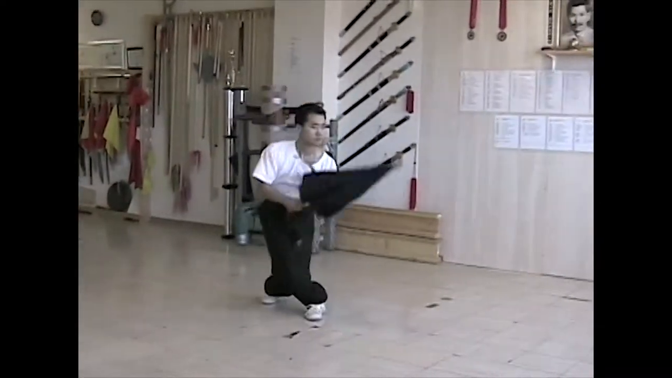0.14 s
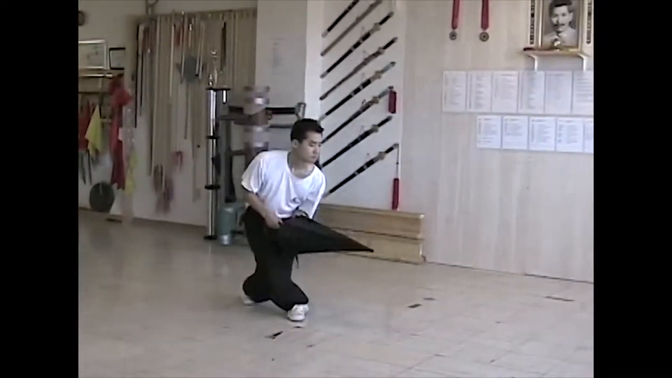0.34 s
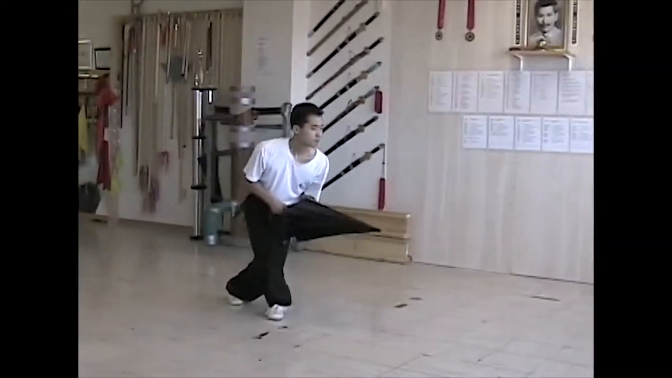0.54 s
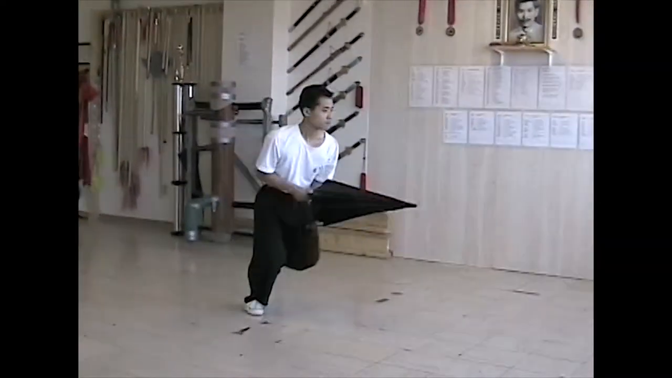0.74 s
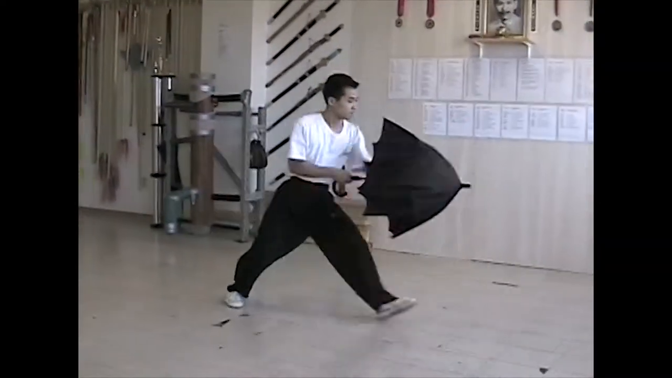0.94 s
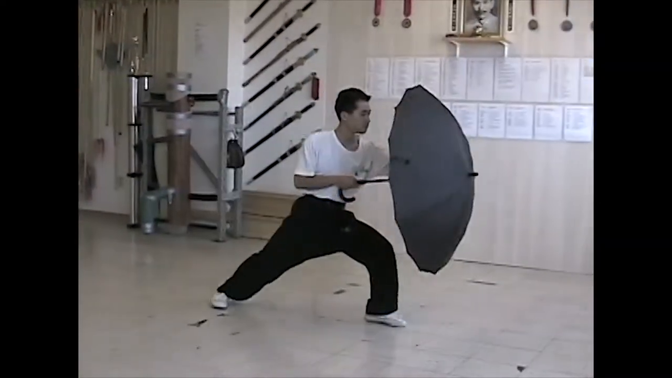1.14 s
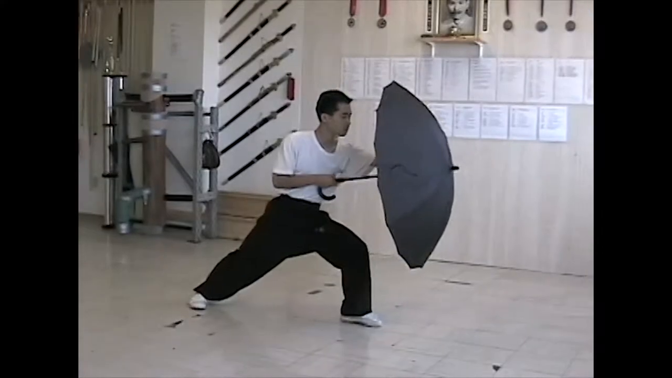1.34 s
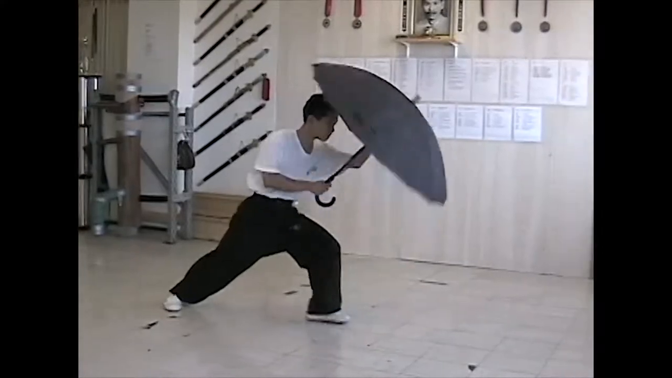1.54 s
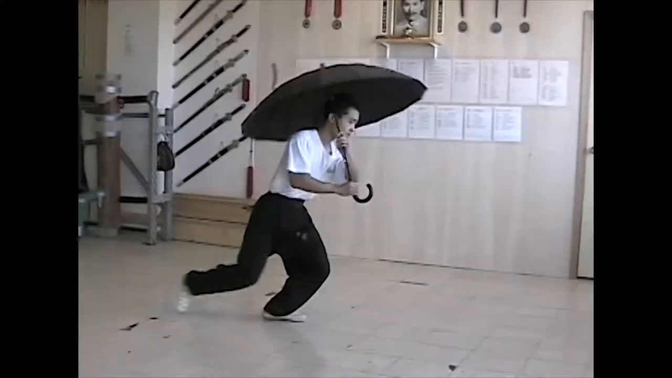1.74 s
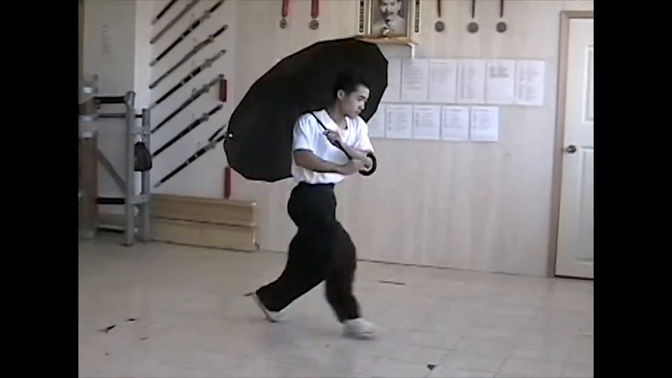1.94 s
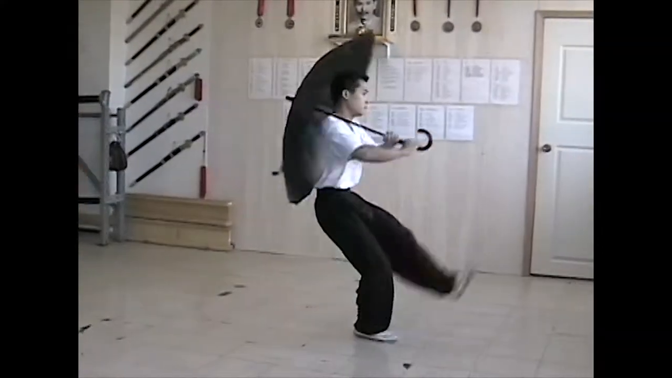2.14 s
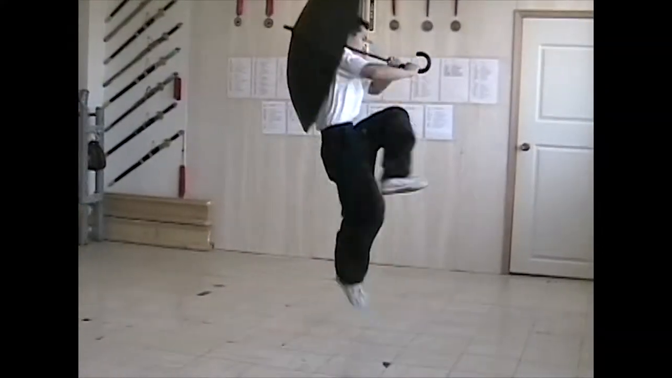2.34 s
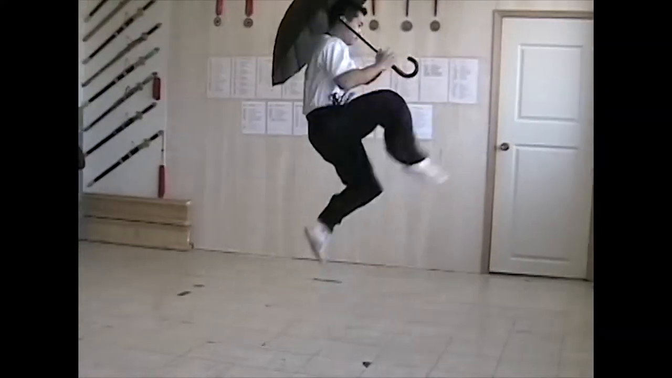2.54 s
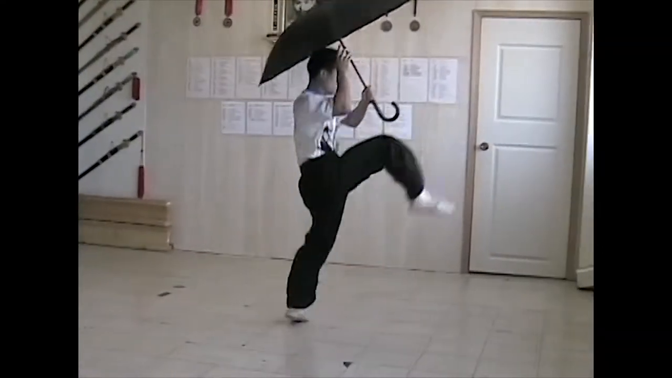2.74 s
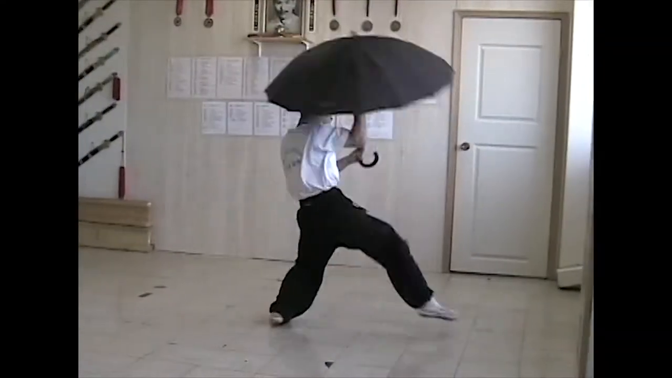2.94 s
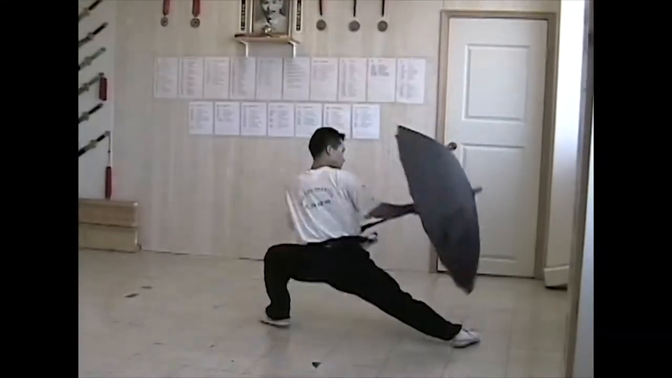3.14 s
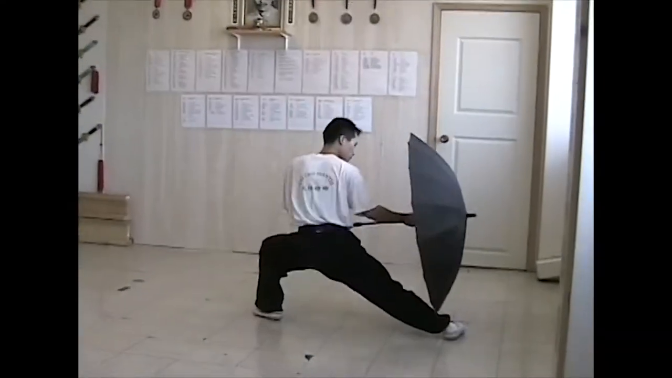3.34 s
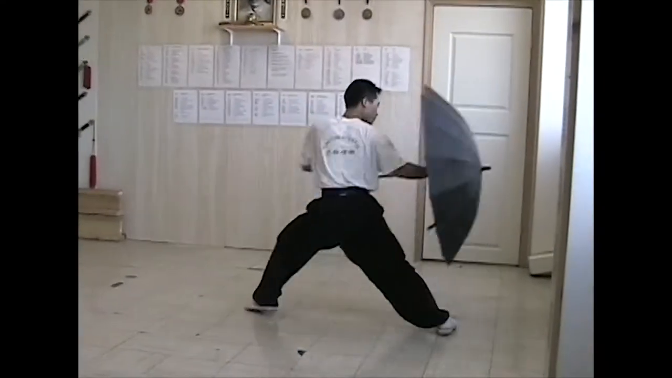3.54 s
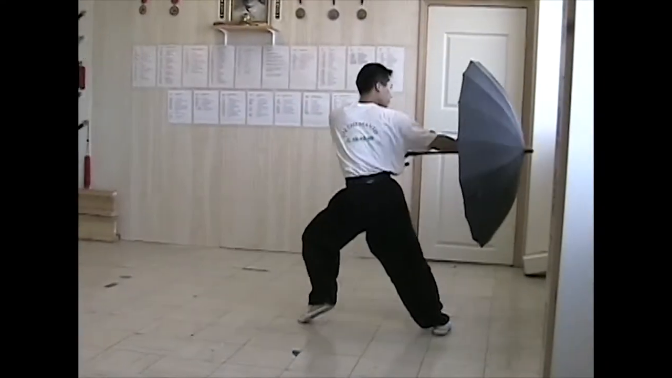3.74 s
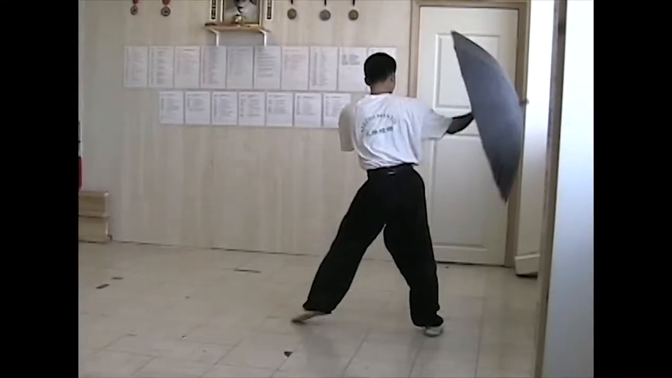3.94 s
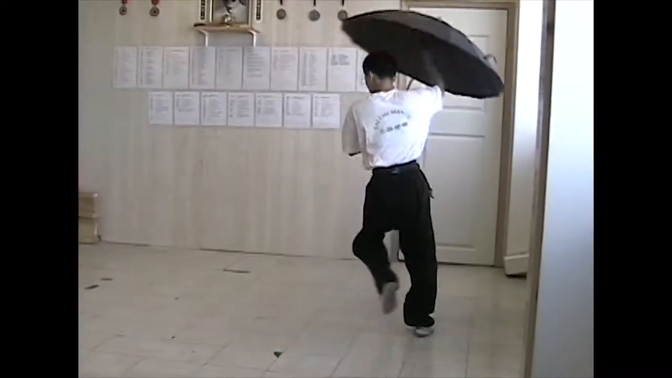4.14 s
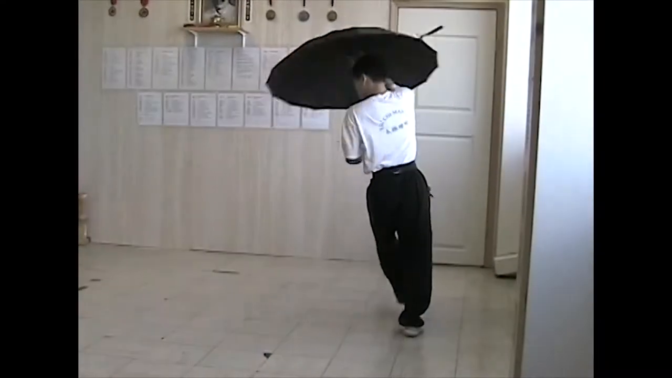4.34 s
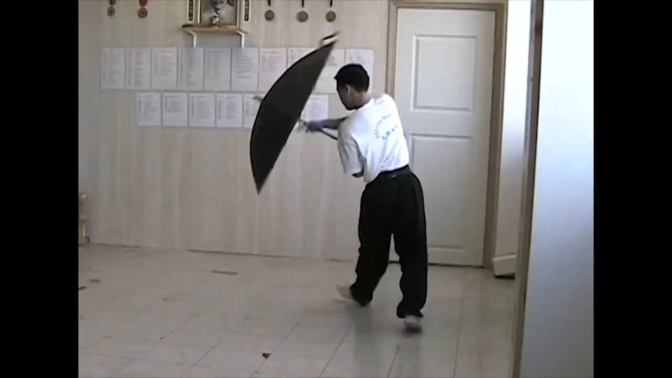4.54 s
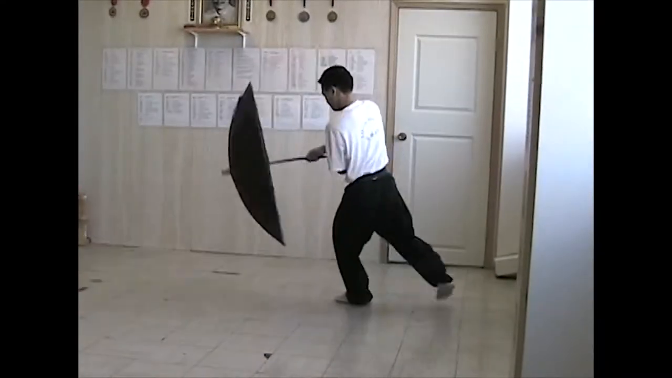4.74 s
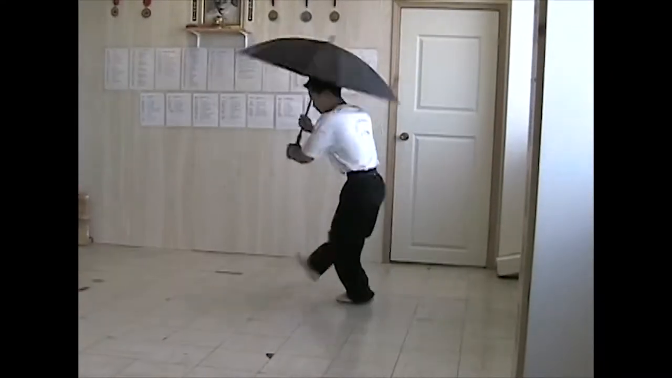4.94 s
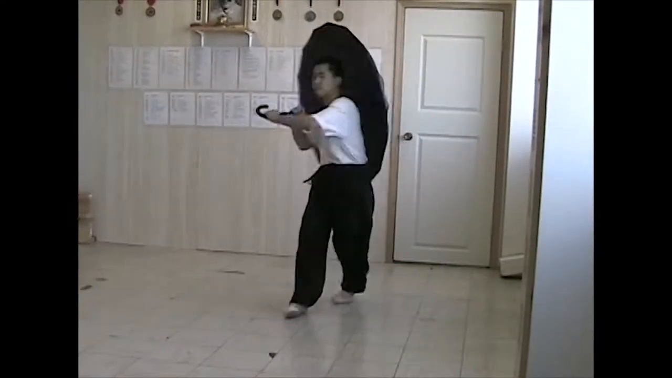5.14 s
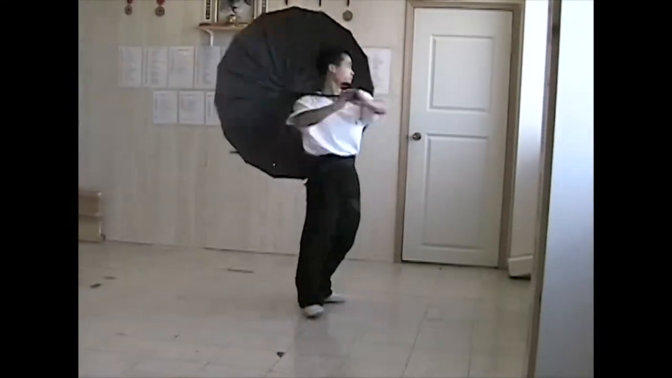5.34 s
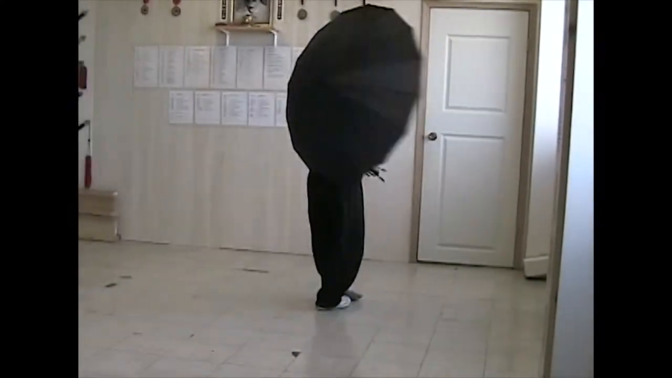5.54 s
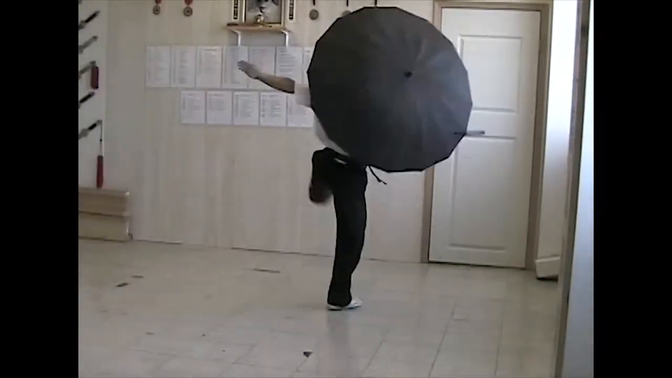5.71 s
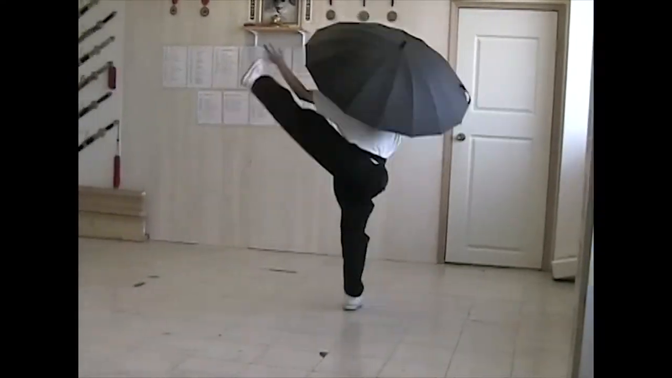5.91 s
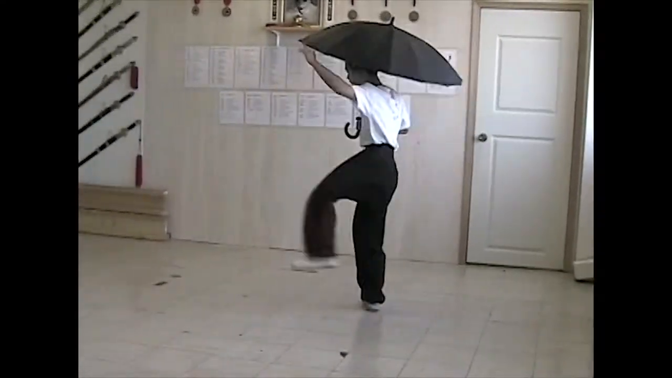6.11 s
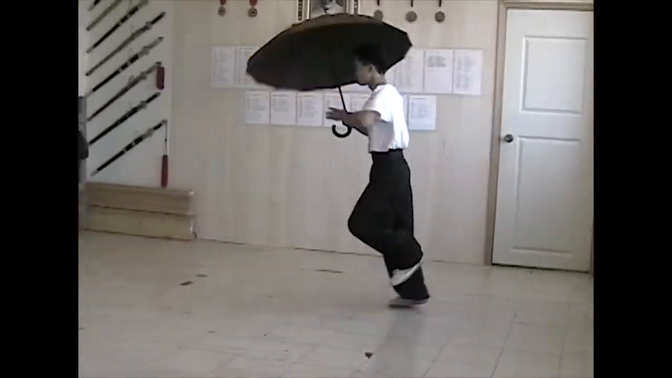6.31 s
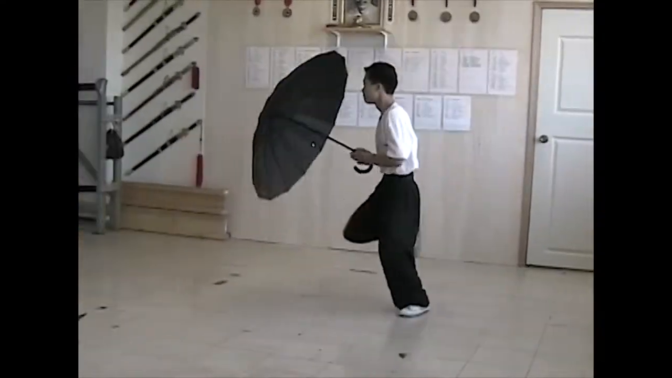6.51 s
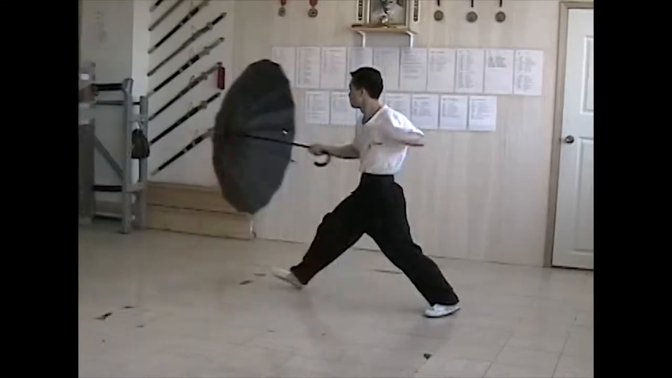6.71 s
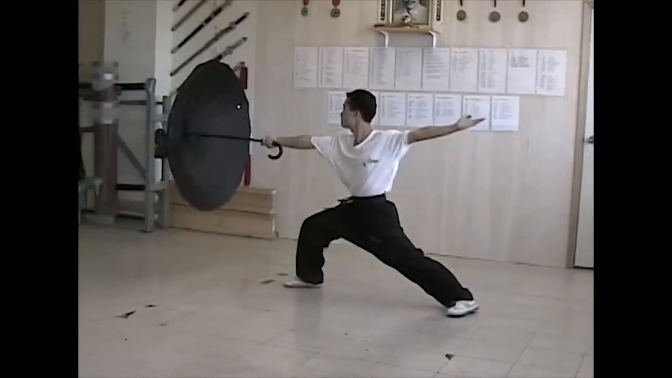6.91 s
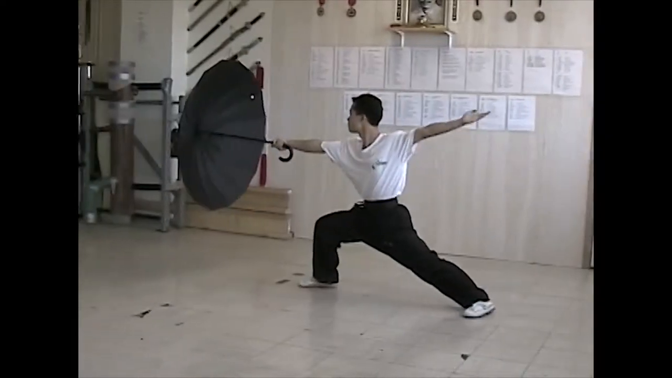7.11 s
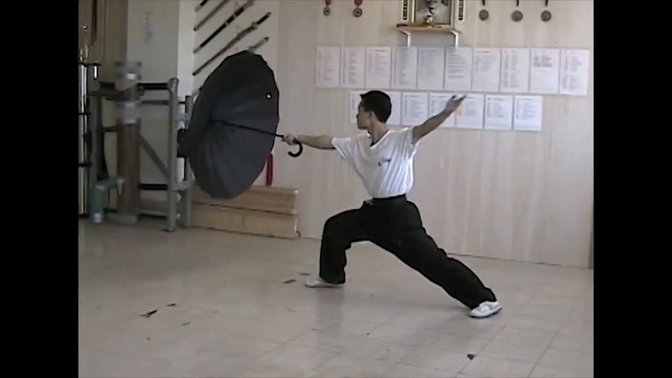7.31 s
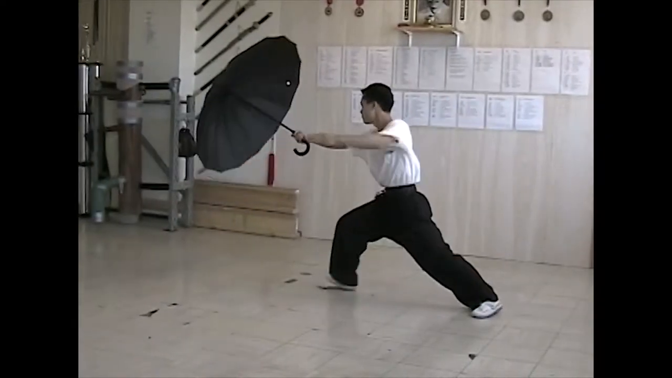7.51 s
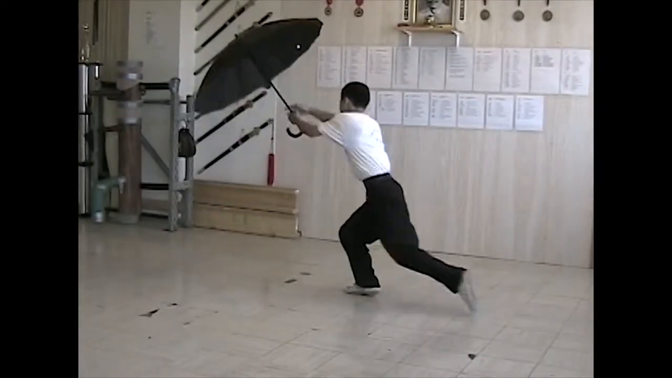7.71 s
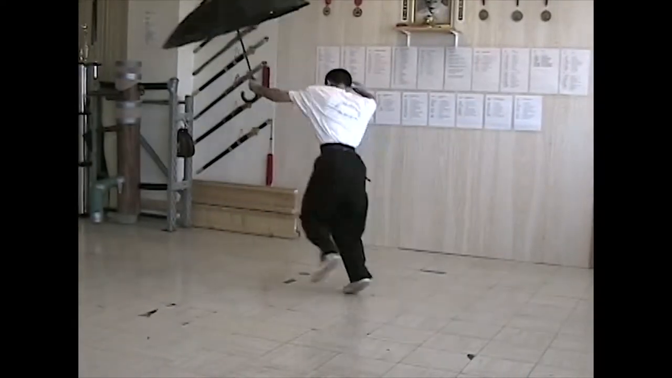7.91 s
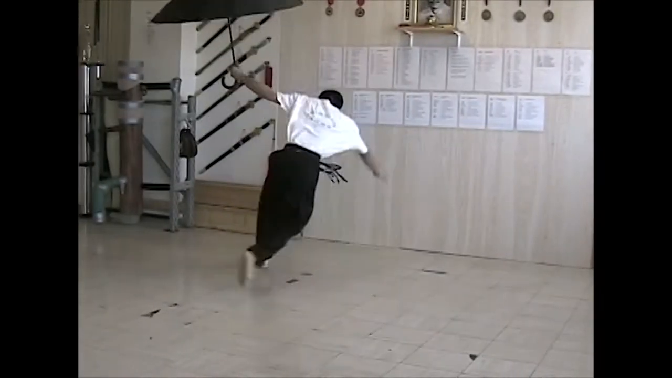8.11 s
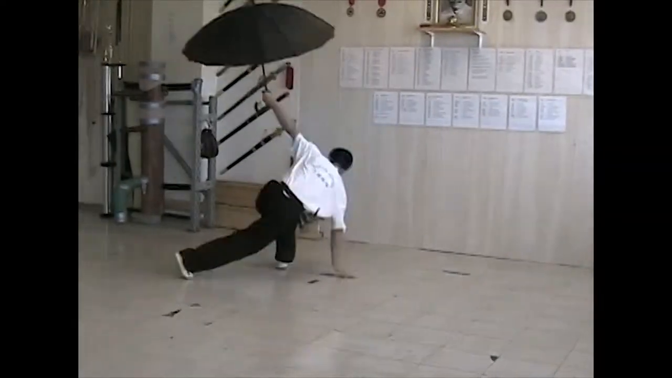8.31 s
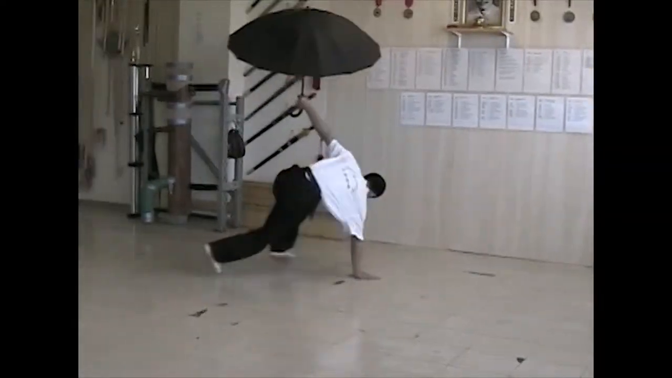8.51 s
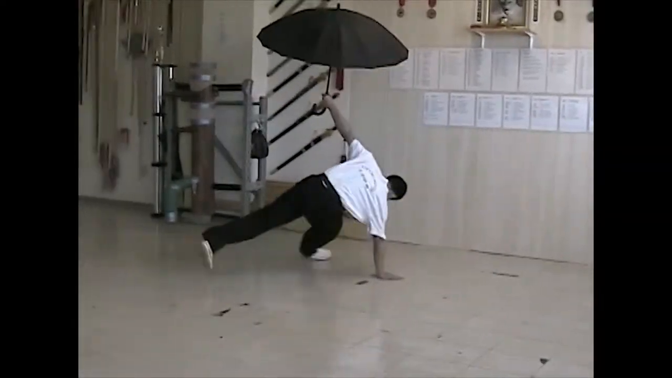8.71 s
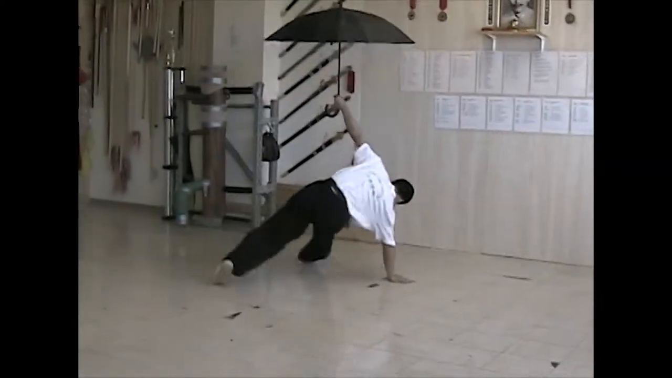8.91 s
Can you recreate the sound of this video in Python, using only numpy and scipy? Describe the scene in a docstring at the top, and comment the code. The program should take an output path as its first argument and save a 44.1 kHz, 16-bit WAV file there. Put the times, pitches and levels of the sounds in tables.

```python
"""A hard, echoing training hall: an umbrella is thrust open, swung and slapped a few metres from a tape camera.
Crackling noise makes the cloth swish and snap, clustered sines the steel runner, whitened bursts the slaps and taps.
Shoes thump in low noise and squeak in gliding tones on the tiles, over dull town rumble and steady motor tones.
The camera's close microphone pair is most alike left and right in the midrange.
A comb notches every 300 Hz against the buzz of its tape drum."""
import sys
import numpy as np
from scipy import signal
from scipy.fft import rfft, irfft, next_fast_len
from scipy.io import wavfile
from scipy.ndimage import uniform_filter1d

SR = 44100
rng = np.random.default_rng(int(sys.argv[2]) if len(sys.argv) > 2 else 0)


def to_wav(sig):
    """Store sig (one row per channel, or 1-D mono) as 16-bit WAV at the path in sys.argv[1].

    Samples outside -1..1 are clipped; the rate is SR.
    """
    pcm = np.clip(np.atleast_2d(sig), -1, 1) * 32767
    pcm = np.round(pcm).astype(np.int16)
    wavfile.write(sys.argv[1], SR, pcm.T)  # frames by channels


N = 399546  # samples, about 9 s
T = np.arange(N) / SR


def undb(db):
    """dB to gain."""
    return 10 ** (np.asarray(db) / 20)


def unit(x):
    """Scale to rms 1."""
    return x / np.sqrt(np.mean(x ** 2))


def decay(t, t60):
    """Exponential fade, 60 dB down after t60 seconds."""
    return np.exp(-np.log(1000) * t / t60)


def band(x, lo_hz, hi_hz):
    """Gentle band-pass."""
    return signal.sosfilt(signal.butter(2, [lo_hz, hi_hz], "band", fs=SR, output="sos"), x)


def on_log(hz, table):
    """Read a (Hz, value) table on a log axis."""
    table_hz, values = np.transpose(table)
    return np.interp(np.log(np.maximum(hz, 1)), np.log(np.maximum(table_hz, 1)), values)


def colour(x, table):
    """Filter by a (Hz, dB) response, made causal by folding its cepstrum (minimum phase)."""
    log_gain = on_log(np.fft.rfftfreq(2048, 1 / SR), table) * np.log(10) / 20
    cepstrum = irfft(log_gain)
    cepstrum[1:1024] *= 2
    cepstrum[1025:] = 0
    response = irfft(np.exp(rfft(cepstrum)))
    return signal.fftconvolve(x, response)[:len(x)]


def curve(table):
    """Read a (s, value) table at every sample."""
    return np.interp(T, *np.transpose(table))


def walk(rate):
    """Random levels held 1 / rate seconds and slewed twice."""
    hold = int(SR / rate)
    steps = np.repeat(rng.standard_normal(N // hold + 1), hold)
    return 0.73 * uniform_filter1d(uniform_filter1d(steps, hold), hold)[:N]


# Town as it reaches the hall. Each row: frequency in Hz, density in relative dB per Hz.
TOWN_SPECTRUM = [(15, -33), (25, -41), (99, -8), (240, -4.5), (305, -0.5), (349, -4), (410, -5.5),
                 (598, -3), (666, -5.5), (895, -8.5), (970, -6), (3630, -21), (5880, -18.5), (7500, -34.5),
                 (12000, -38), (15500, -56)]
# Swell of the rumble, mostly below 1800 Hz. Each row: time in seconds, level in relative dB.
RUMBLE_LEVEL = [(0.0, -50), (0.5, -50.5), (1.3, -48.5), (3.08, -47.5), (3.6, -48.5), (4.39, -46.5),
                (4.85, -48), (7.11, -47), (9.06, -47.5)]
# Steady tones of the camera's motor. Each row: frequency in Hz, width in Hz, level in relative dB.
MOTOR_TONES = [(30.2, 10, -75.5), (59.8, 4.5, -70.5), (362.5, 4.14, -58), (5890, 14, -70)]


def town():
    """Distant traffic through the walls, swelling in the bass, with the camera's own motor tones."""
    noise = colour(rng.standard_normal(N), TOWN_SPECTRUM)
    gain = undb(curve(RUMBLE_LEVEL)) / np.std(band(noise, 67, 2240))
    high = signal.sosfilt(signal.butter(1, 1800, "high", fs=SR, output="sos"), noise)
    low = noise - high
    out = gain * low + undb(-4.5) * np.median(gain) * high  # the highs stay steady
    for hz, width, db in MOTOR_TONES:
        out += undb(db) * unit(band(rng.standard_normal(N), hz - width / 2, hz + width / 2))
    return out


def three_bands(x, low_hz):
    """Low, middle and air parts of a noise, each rms 1; signs alternate so that neighbours add."""
    low = -unit(band(x, low_hz, 1780))
    middle = unit(band(x, 950, 9940))
    air = -unit(band(x, 7800, 14000))
    return low, middle, air


def cloth(gains, crackle_db, flutter_db, low_hz):
    """Taut nylon: dense creases pop with uneven sizes, and the panels flutter."""
    sizes = np.repeat(rng.exponential(size=N // 8 + 1), 8)[:N]
    pops = rng.standard_normal(N) * undb(crackle_db * sizes)
    parts = three_bands(pops, low_hz)
    flutter = undb(flutter_db * walk(40))
    return flutter * sum(gain * part for gain, part in zip(gains, parts))


# Cloth swept through the air. Each row: centre in seconds, half length in seconds (down to 1/e),
# level in relative dB, air share in dB over the middle band.
SWEEPS = [(0.054, 0.079, -58, 5.5), (0.183, 0.098, -58.5, 0), (0.602, 0.083, -65, -30),
          (1.577, 0.15, -63, 10), (1.916, 0.031, -63.5, 9.5), (2.098, 0.044, -64.5, -12),
          (2.266, 0.13, -65, 2), (2.49, 0.059, -62, -7), (2.88, 0.078, -60, 4), (3.045, 0.092, -52.5, -12),
          (3.292, 0.011, -57.5, 14), (3.55, 0.14, -62, 5.5), (4.152, 0.023, -58, -6),
          (4.387, 0.017, -46, 10.5), (4.686, 0.054, -57.5, 10.5), (5.076, 0.067, -60.5, 1),
          (5.215, 0.035, -54, 3), (5.5, 0.12, -66.5, -2), (5.977, 0.13, -46.5, -14),
          (6.562, 0.07, -51.5, -11), (6.825, 0.053, -50.5, -4), (6.888, 0.023, -55.5, -13),
          (7.507, 0.055, -69, 16), (7.64, 0.061, -60, 1), (8.135, 0.021, -58.5, -18),
          (8.35, 0.038, -58, -14), (8.717, 0.051, -61, -12)]


def swishes():
    """Every sweep of the cloth swells and fades like a bell curve."""
    gains = np.zeros((3, N))
    for s, half, db, air_db in SWEEPS:
        part = slice(max(int((s - 3 * half) * SR), 0), int((s + 3 * half) * SR))
        bell = np.exp(-((T[part] - s) / half) ** 2)
        band_gains = undb(db + np.array([0, 0, air_db]))  # low and middle alike
        gains[:, part] += band_gains[:, None] * bell
    return cloth(gains, 2.2, 2.4, 270)


# How long the hall rings. Each row: frequency in Hz, time to fade 60 dB in seconds.
HALL_T60 = [(100, 0.92), (500, 0.7), (1500, 0.28), (4000, 0.54), (8000, 0.42), (14000, 0.19)]
HALL_DB, HALL_GAP_S = -2.5, 0.0007  # echo energy; silence before the echo


def hall():
    """Diffuse echo: noise in overlapping half-octave steps, each fading at its own rate."""
    t = T[:int(1.5 * SR)]
    hz = np.fft.rfftfreq(len(t), 1 / SR)
    noise, out = rfft(rng.standard_normal(len(t))), 0
    for centre in 2 ** np.arange(5, 14.5, .5):
        octaves_off = np.abs(np.log2(np.maximum(hz, 1) / centre))
        share = np.clip(1 - octaves_off * 2, 0, 1)
        out = out + irfft(noise * share, len(t)) * decay(t, on_log(centre, HALL_T60))
    out *= np.clip(t / HALL_GAP_S - 1, 0, 1)  # fades in over a second gap length
    return undb(HALL_DB) * out / np.sqrt(np.sum(out ** 2))


BLOOM_DB, BLOOM_S, BLOOM_TOP_HZ = -16, 0.068, 1620  # echo energy, time of its swell's peak, top of its band


def bloom():
    """Low echo from the far end of the hall: it swells after the blow, then fades."""
    t = T[:SR] / BLOOM_S
    swell = t ** 2 * np.exp(-2 * t)
    echo = band(rng.standard_normal(SR), 65, BLOOM_TOP_HZ) * swell
    return undb(BLOOM_DB) * unit(echo) / np.sqrt(SR)


# Rubber sole slipping on tile. Each row: start in seconds, length in seconds, start pitch in Hz,
# end pitch in Hz, level in relative dB, octave share in dB, wobble in Hz.
SOLE_SLIPS = [(0.512, 0.077, 4126, 4230, -46, -2.5, 259), (3.012, 0.013, 4480, 4200, -32.5, -28, 90),
              (3.038, 0.02, 4210, 4150, -39, -25, 110), (3.062, 0.037, 3910, 3810, -34.5, -13, 80),
              (3.653, 0.0099, 5700, 5290, -28.5, -10, 39.6), (3.665, 0.019, 5020, 4800, -42, -18, 120),
              (8.844, 0.014, 5120, 4850, -55, 7, 60)]


def squeaks():
    """Fast stick-slip of a sole: a gliding, wobbling tone with its octave."""
    out, wobble = np.zeros(N), walk(900)
    for s, length, start_hz, end_hz, db, octave_db, wobble_hz in SOLE_SLIPS:
        i, n = int(s * SR), int(length * SR)
        pitch = np.linspace(start_hz, end_hz, n) + wobble_hz * wobble[i:i + n]
        phase = 2 * np.pi * np.cumsum(pitch) / SR
        tone = np.sin(phase) + undb(octave_db) * np.sin(2 * phase)
        out[i:i + n] += undb(db) * signal.windows.tukey(n, .5) * tone
    return out


# Panels of the canopy pulling taut one after another. Each row: start in seconds, rise in seconds,
# time to fade 60 dB in seconds, level in relative dB, low share and air share in dB over the middle band.
PANELS = [(0.78, 0.016, 0.42, -27.5, -5, 4), (0.806, 0.0068, 0.21, -18, 1.5, -14),
          (0.861, 0.0024, 0.095, -22, 2.5, -25), (0.922, 0.0017, 0.072, -12, -4.5, -34),
          (1.0, 0.037, 0.48, -27.5, -6.5, -25), (6.404, 0.0032, 0.055, -19, -13, 12)]


def flaps():
    """Each panel's cloth noise swells quickly and dies away."""
    gains, t = np.zeros((3, N)), T[:SR // 3]
    for s, rise, t60, db, low_db, air_db in PANELS:
        i = int(s * SR)
        shape = (1 - np.exp(-t / rise)) ** 2 * decay(t, t60)
        band_gains = undb(db + np.array([low_db, 0, air_db]))
        gains[:, i:i + len(t)] += band_gains[:, None] * shape
    return cloth(gains, 3.3, 1.8, 555)


# Body weight coming down on the floor. Each row: start in seconds, pitch in Hz, level in relative dB.
FLOOR_PUSHES = [(0.824, 173, -31), (0.93, 202, -35.5), (2.972, 151, -43.5), (4.367, 131, -47),
                (5.17, 119, -47), (6.368, 151, -31.5), (6.791, 100, -44), (6.84, 110, -42),
                (8.111, 85, -44.5)]
THUMP_SPAN, THUMP_RISE_S, THUMP_T60_S = 1.46, 0.0021, 0.15  # the band reaches from pitch / span to pitch x span


def thumps():
    """A soft low push into the floor: narrow noise with a quick rise and a short fade."""
    out, t = np.zeros(N), T[:SR // 4]
    shape = (1 - np.exp(-t / THUMP_RISE_S)) * decay(t, THUMP_T60_S)
    for s, hz, db in FLOOR_PUSHES:
        i = int(s * SR)
        push = unit(band(rng.standard_normal(len(t)), hz / THUMP_SPAN, hz * THUMP_SPAN))
        out[i:i + len(t)] += undb(db) * push * shape
    return out


# Slaps, footfalls and ticks. Each row: start in seconds, crack level in relative dB, weight in dB of the
# thud over the crack, air share in dB over the crack, 60 dB fade in seconds of the burst before whitening.
BLOWS = [(0.826, -26.5, 19, -22, 0.17), (1.0976, -3.5, -17, -7.5, 0.082), (1.3951, -26.5, -10, -25, .032),
         (1.4044, -20.5, -13, -18.5, 0.023), (1.4466, -31.5, -3.5, -10, 0.026),
         (1.9741, -38.5, 8, -4, 0.026), (2.2216, -28.5, -10, -19, 0.017), (2.233, -25.5, -14, -21, 0.036),
         (2.2633, -27, -17, -22, .03), (2.3335, -33, -15, -18, .02), (2.3524, -33, -5, -14, 0.012),
         (2.6618, -20, -2, -18, 0.012), (2.7436, -17.5, -13, -20.5, 0.017), (2.8756, -28, -14, -16, 0.021),
         (2.9297, -29, -4.5, -33, 0.012), (2.9715, -16.5, -4, -10.5, 0.015), (3.01, -17.5, -7, -19, 0.021),
         (3.6104, -25.5, -9.5, -16, 0.038), (4.117, -26, -26, -10.5, 0.06), (4.1394, -39.5, 11, -17, 0.022),
         (4.338, -35.5, -20, -11, .035), (4.3654, -23, 0, -5, .034), (4.6319, -31.5, -4, -17, 0.044),
         (5.0595, -35.5, 5, -32, 0.053), (5.1598, -32.5, -3, -13, 0.04), (5.4688, -36, -2, -18, .022),
         (5.8172, -12.5, 13.5, -7.5, 0.033), (5.8266, 3, -14.5, -31, 0.085), (6.3646, 0.5, -5.5, -11, 0.11),
         (6.7153, -22, -5.5, -22, 0.031), (6.7855, -19, -6.5, -11.5, 0.11),
         (6.8355, -20.5, -6.5, -8.5, 0.043), (7.6032, -38.5, 5, -25, .022), (7.876, -42, -10, -9, .015),
         (7.9003, -44, -5, -37, 0.016), (8.111, -39, 0, -13, 0.033), (8.1496, -36, 4.5, -21, 0.036),
         (8.3164, -29, -3, -6, 0.049), (8.524, -38.5, -4, -10, 0.029), (8.7177, -13, -24, -27, 0.0081),
         (8.7289, -36, 13, -27, 0.023), (8.76, -36, 2, -28, .025)]
# Boom, thud, body, crack and air of a blow. Each row: centre in Hz, width in Hz.
BLOW_PARTS = [(130, 540), (600, 1370), (1900, 5600), (4600, 22500), (9500, 550)]
BOOM_DB, BOOM_PER_WEIGHT, BODY_DB, BODY_PER_WEIGHT = -21.5, 0.43, -1.5, 0.89  # boom and body follow the weight in part
TICK_S = 0.00016
TICK_DB, TICK_DB_PER_S = 15, -380  # the longer a blow is smeared, the weaker its first tick


def hits():
    """Each blow is a sharp tick and a burst that dies fast; a heavier blow tilts toward the low bands."""
    out = np.zeros(N + 2048)
    t, (hz, width) = T[:4096], np.transpose(BLOW_PARTS)
    for s, db, weight_db, air_db, t60 in BLOWS:
        tick = undb(TICK_DB + TICK_DB_PER_S * t60) * np.exp(-t / TICK_S)
        spectrum = rfft(rng.standard_normal(4096) * (decay(t, t60) + tick))
        white = irfft(spectrum / np.abs(spectrum))  # the burst has no pitch of its own
        burst = white[:2048] * np.hanning(4096)[2048:]
        boom_db = BOOM_DB + BOOM_PER_WEIGHT * weight_db
        body_db = BODY_DB + BODY_PER_WEIGHT * weight_db
        shares_db = np.array([boom_db, weight_db, body_db, 0, air_db])
        per_hz_db = db + shares_db + 10 * np.log10(SR / width)
        bass = (45, per_hz_db[0] - 25.0)  # too small to move much bass
        i = int(s * SR)
        out[i:i + 2048] += colour(burst, [bass, *zip(hz, per_hz_db)])
    return undb(11.5) * out[:N]


# Steel shaft and ribs. Each row: mode in Hz, level in dB on top of RUNNER_DB.
STEEL_MODES = [(3994, -6), (4630, 1), (4900, -13), (5300, -5), (5507, -6), (5900, 3.5), (6570, -3),
               (6700, -3), (7063, -21), (7300, -11), (9100, -14), (9300, -10), (9857, -13), (10200, -24)]
RUNNER_S, RUNNER_DB, RUNNER_T60_S, RIB_SPREAD_HZ = 1.099, -23, .13, 70  # start, level, 60 dB fade, spread


def runner():
    """The runner clicks into its catch and the loose steel frame jangles, damped by hand and cloth."""
    out, i = np.zeros(N), int(RUNNER_S * SR)
    t = T[:SR // 3]
    shape = np.minimum(t / 0.002, 1) * decay(t, RUNNER_T60_S)
    for hz, db in STEEL_MODES:
        # ribs of near-equal length smear each mode into a small cluster
        cluster = hz + RIB_SPREAD_HZ * rng.standard_normal((9, 1))
        ring = np.sin(2 * np.pi * (cluster * t + rng.random((9, 1)))).sum(axis=0) / np.sqrt(9)
        out[i:i + len(t)] += undb(RUNNER_DB + db) * ring * shape
    return out


# Brief soft hums. Each row: start in seconds, length in seconds, pitch in Hz, width in Hz, level in relative dB.
HUMS = [(2.081, 0.074, 720, 90, -53.5), (4.14, .3, 446, 50, -56)]


def drones():
    """Narrow noise hums that come and go."""
    out = np.zeros(N)
    for s, length, hz, width, db in HUMS:
        i, n = int(s * SR), int(length * SR)
        hum = band(rng.standard_normal(SR), hz - width / 2, hz + width / 2)[-n:]
        out[i:i + n] += undb(db) * unit(hum) * signal.windows.tukey(n, .3)
    return out


# Pitched ring of some blows, sounding with the slap or tap itself.
# Each row: start in seconds, pitch in Hz, level in relative dB.
BLOW_RINGS = [(2.0854, 720, -50), (3.6104, 2660, -45.5), (4.3655, 4500, -35), (5.0601, 1280, -48),
              (5.8179, 1900, -20.5), (5.826, 784, -24), (7.8747, 2980, -55), (7.9004, 3530, -42.5)]
RING_SPREAD, RING_CYCLES = 0.27, 23  # share of the pitch over which the modes lie; cycles until 60 dB down


def blow_rings():
    """Pitched ring of some blows: a bunch of close modes struck together, soon damped."""
    out, t = np.zeros(N), T[:4096]
    for s, hz, db in BLOW_RINGS:
        i = int(s * SR)
        modes = hz * (1 + RING_SPREAD * rng.uniform(-0.89, 1, (16, 1)))
        ring = np.sin(2 * np.pi * modes * t).sum(axis=0) / 2
        out[i:i + len(t)] += undb(db) * band(ring * decay(t, RING_CYCLES / hz), hz / 2, hz * 2)
    return out


# Resonance of the stretched canopy. Each row: frequency in Hz, gain in dB.
CANOPY_TONE = [(300, -3), (800, 0), (1700, 2.5), (4000, 0.5), (9000, -4)]
# Colour of the microphone capsule on all near sounds but the steel. Each row: frequency in Hz, gain in dB.
CAPSULE_TONE = [(25, -27), (70, -9), (200, 1), (500, 3.5), (5500, 3.5), (7500, -12.5), (9500, -11.5),
                (15000, -39)]
# Width of the close microphone pair. Each row: frequency in Hz, side minus mid in dB.
PAIR_WIDTH = [(60, -2), (110, -3), (200, -9.5), (380, -15), (700, -16.5), (1290, -19.5), (2380, -16.5),
              (4400, -19.5), (8120, -4), (15000, 5)]
PORTS_ALIKE_HZ = 680  # well below this the side signal is the middle itself, a quarter cycle late


def echo(x):
    """Send a sound through a freshly drawn hall and its late low bloom."""
    return signal.fftconvolve(x, hall())[:N] + signal.fftconvolve(x, bloom())[:N]


def scene():
    """Direct sound, hall and town; the side lags the middle in the bass and draws its own hall and town above."""
    near = hits() + blow_rings() + thumps() + swishes() + colour(flaps(), CANOPY_TONE) + squeaks() + drones()
    near, steel = colour(near, CAPSULE_TONE), runner()
    mid = near + 0.7 * steel + echo(near + 0.82 * steel) + town()
    other = 0.5 * near + echo(near + steel) + undb(2.0) * town()
    size = next_fast_len(N)
    hz = np.fft.rfftfreq(size, 1 / SR)
    alike = 1 / (1 + (hz / PORTS_ALIKE_HZ) ** 4)
    blend = np.sqrt(alike) * rfft(mid, size) + np.sqrt(1 - alike) * rfft(other, size)
    # the pair's colour acts here without delay, to keep the quarter cycle
    side = irfft(-1j * undb(on_log(hz, PAIR_WIDTH)) * blend, size)[:N]
    return np.array([mid + side, mid - side])


DRUM_LAG = 147  # samples, one period of a 300 Hz buzz
TOP_HZ = 15850


def record(dry):
    """Notches at every multiple of the drum buzz, soft overload, steep top."""
    # one row per drum period, so the comb runs down the columns
    rows = np.pad(dry, ((0, 0), (0, -N % DRUM_LAG))).reshape(2, -1, DRUM_LAG)
    # full-depth notches; the feedback of 0.56 narrows them
    combed = signal.lfilter([1, -1], [1, -0.56], rows, axis=1).reshape(2, -1)[:, :N]
    overloaded = np.tanh(.9 * combed)
    return signal.sosfilt(signal.ellip(10, .2, 60, TOP_HZ, fs=SR, output="sos"), overloaded)


dry = scene()
out = record(dry)
to_wav(out)
```